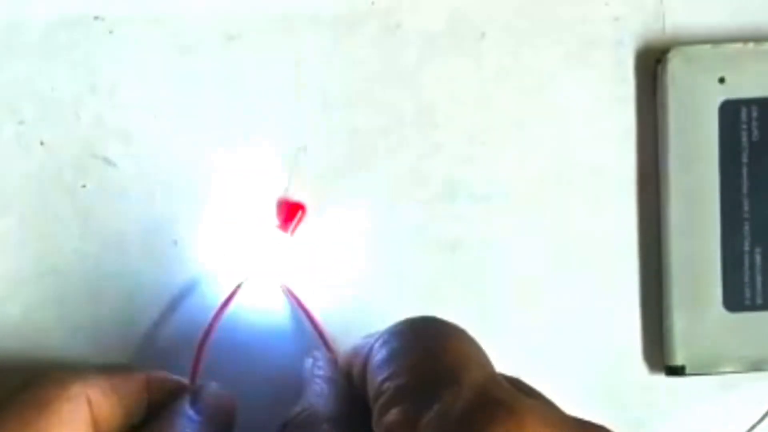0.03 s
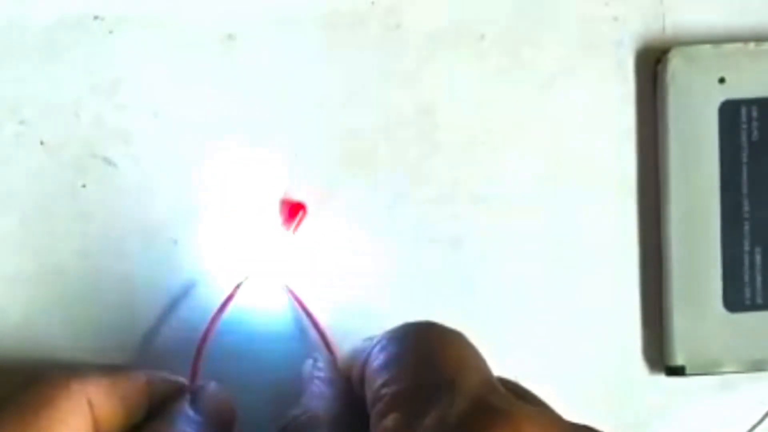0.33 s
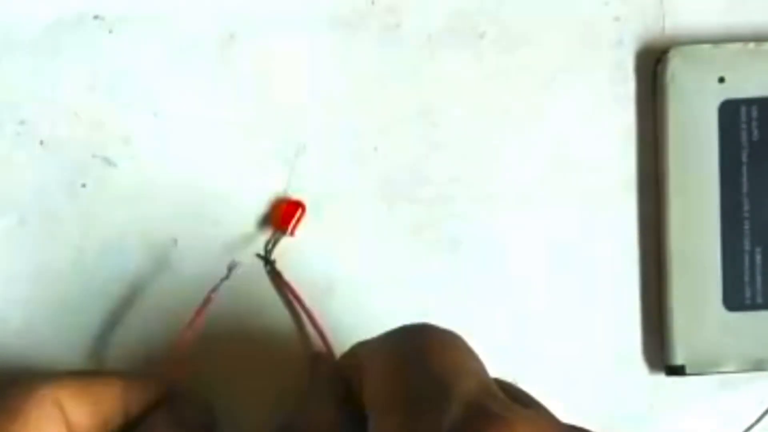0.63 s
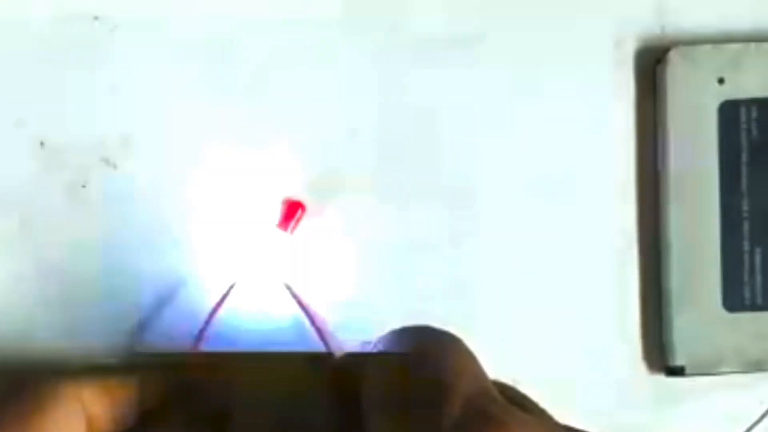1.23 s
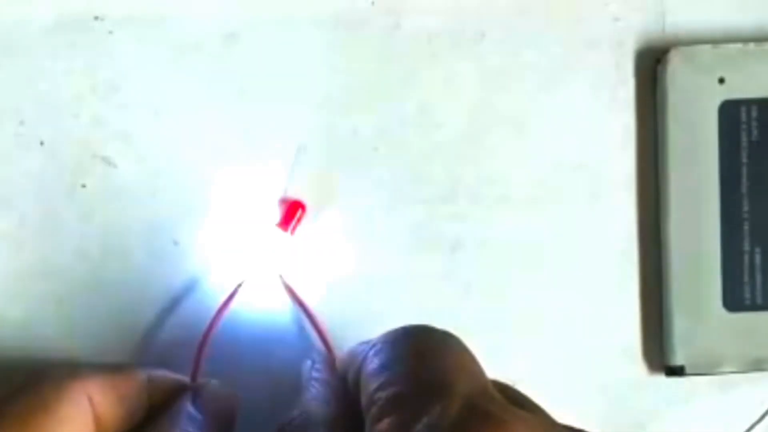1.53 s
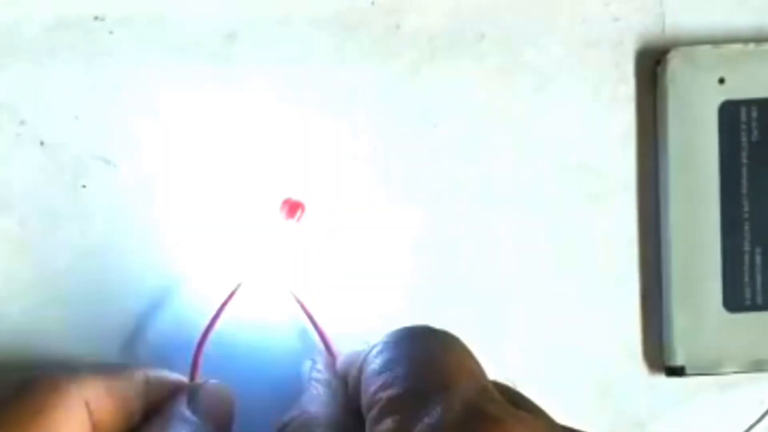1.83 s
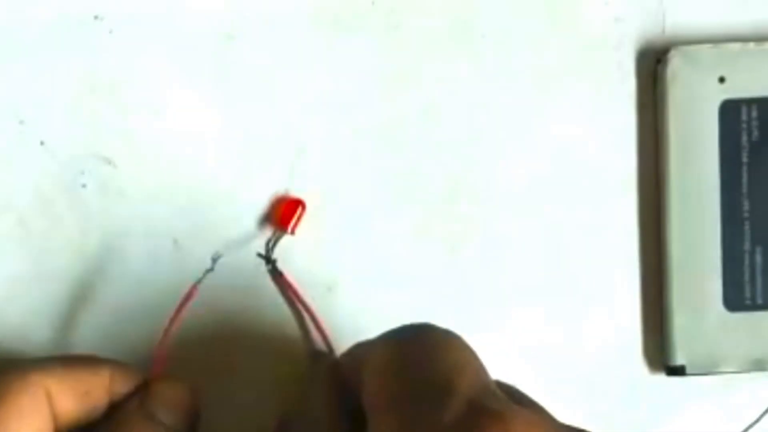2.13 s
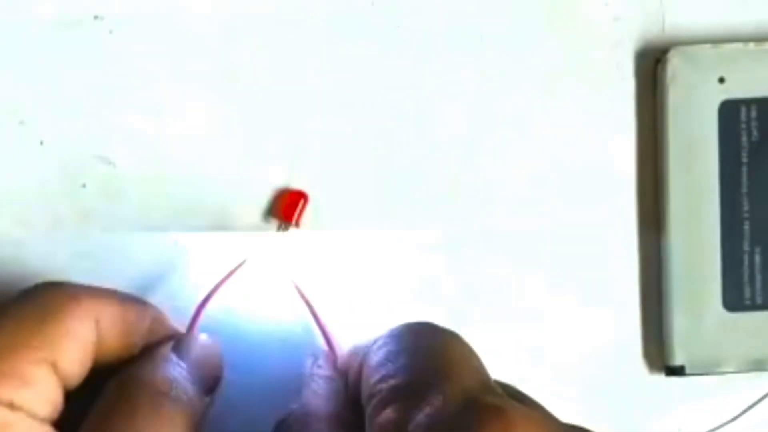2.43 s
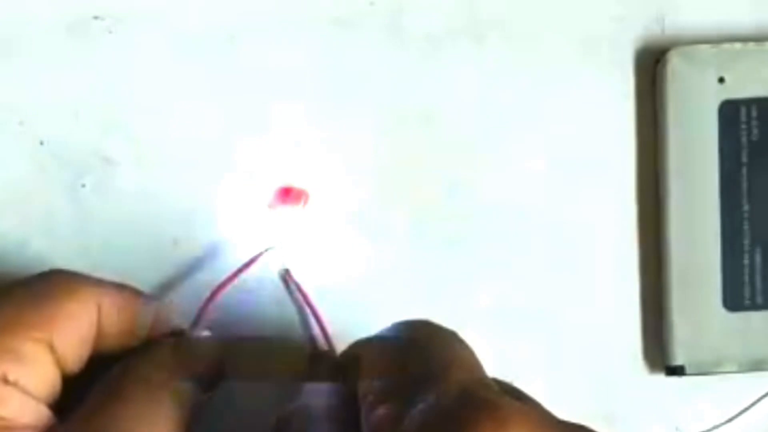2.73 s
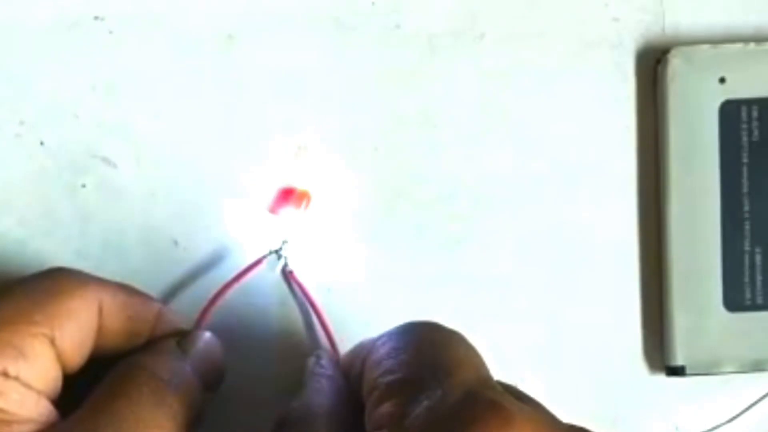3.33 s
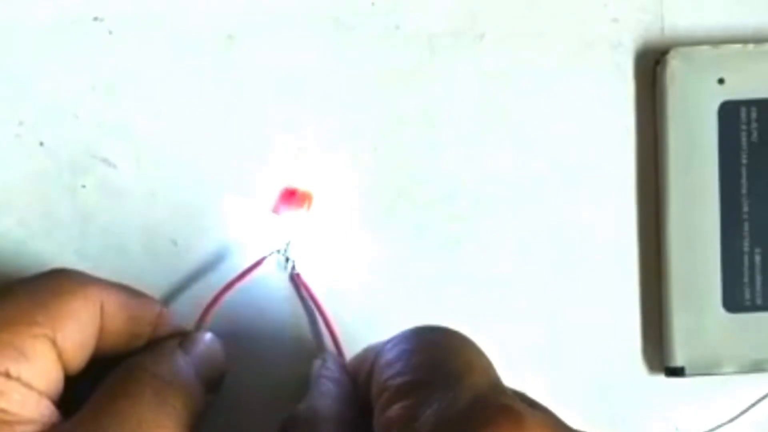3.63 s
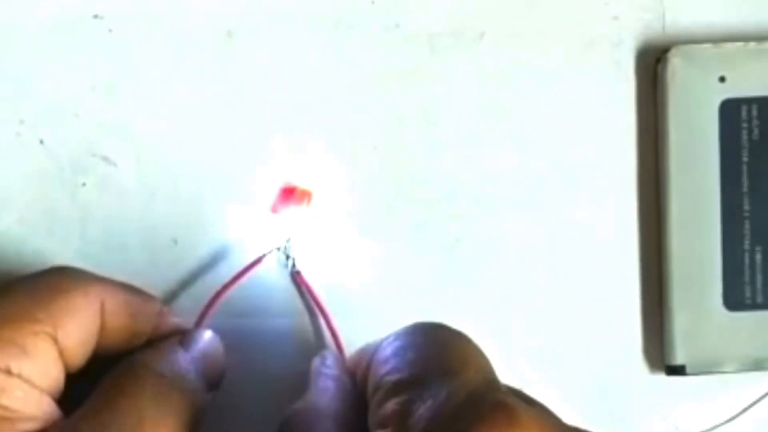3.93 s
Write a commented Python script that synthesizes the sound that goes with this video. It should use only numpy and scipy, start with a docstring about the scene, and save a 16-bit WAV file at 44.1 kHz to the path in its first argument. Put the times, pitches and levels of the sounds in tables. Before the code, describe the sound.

Harsh electric arcing builds from faint hiss into a close, overloaded buzz as two wires spark. It stops for a moment, comes back louder with irregular cracks and sizzle, and keeps sputtering with hardly any room sound.

```python
"""Out of faint hiss, a mains-fed spark strikes between two wire tips and its interference enters a recorder.
The arc restrikes every half cycle with a tick, sizzles in between and cracks as it jumps to a new spot.
Soon heavy flares saturate the input, choking the sizzle until the coupling capacitor recovers; some break
up in hard snaps. The harsh buzz swells, stops briefly near 1.5 s, resumes louder, breaks for an instant
near 3.1 s and sputters on to the end."""
import sys
import numpy as np
from scipy import signal
from scipy.fft import rfft, irfft, next_fast_len
from scipy.io import wavfile
from scipy.ndimage import uniform_filter1d

SR = 44100
rng = np.random.default_rng(int(sys.argv[2]) if len(sys.argv) > 2 else 0)


def dump(signal):
    """Clip the signal to [-1, 1] and save it as 16-bit WAV at the path in sys.argv[1]."""
    limited = np.clip(np.atleast_2d(signal).T, -1, 1)
    pcm = np.round(limited * 32767).astype(np.int16)
    wavfile.write(sys.argv[1], SR, pcm)


N = 176400
TIME = np.arange(N) / SR
MAINS_HZ = 50.01


def amp(db):
    """Amplitude ratio of a level in decibels."""
    return 10 ** (np.asarray(db) / 20)


def curve(rows):
    """Linear interpolation of (t/s, value) rows at every sample."""
    return np.interp(TIME, *np.transpose(rows))


def wander(rate_hz):
    """Slow noise: linear interpolation between Gaussian values drawn at rate_hz."""
    return np.interp(TIME * rate_hz, np.arange(N), rng.standard_normal(N))


def coloured(x, points):
    """Minimum-phase filter with the (f/Hz, level/dB) response, built by folding the cepstrum."""
    size = 2 * next_fast_len(N // 2 + 8192)
    hz, db = np.transpose(points)
    log_hz = np.log(np.fft.rfftfreq(size, 1 / SR) + 1)
    cepstrum = irfft(np.log(amp(np.interp(log_hz, np.log(hz), db))))
    cepstrum[1:size // 2] *= 2
    cepstrum[size // 2 + 1:] = 0
    return irfft(rfft(x, size) * np.exp(rfft(cepstrum)))[:N]


def noise(points):
    """Spectrally shaped Gaussian noise of unit rms."""
    x = coloured(rng.standard_normal(N), points)
    return x / x.std()


def burst(start, db, ms):
    """Envelope with an instant onset and a Gaussian decay."""
    age_ms = (TIME - start) * 1000
    return amp(db) * (TIME >= start) * np.exp(-np.minimum((age_ms / ms) ** 2, 20))


# Spectrum of the input's own noise: f/Hz, relative level/dB
FLOOR_SPECTRUM = [(30, 13), (300, -2), (2000, -16), (11000, -15), (16000, -20)]
def input_hiss():
    """Noise floor: a faint, stationary hiss."""
    return amp(-82) * noise(FLOOR_SPECTRUM)


# Stretches of arcing: first strike t/s, end t/s
ARCS = [(.0843, 1.466), (1.6323, 3.09), (3.1161, 4.0)]
def arc():
    """Reignition every half cycle: returns the strike times and a gate that is 1 while the arc burns."""
    jitter_s = .00012
    grid = np.concatenate([np.arange(start, end, .5 / MAINS_HZ) for start, end in ARCS])
    strikes = grid + jitter_s * rng.standard_normal(len(grid))
    gate = sum(1. * ((TIME > start) & (TIME < end)) for start, end in ARCS)
    return strikes, uniform_filter1d(gate, size=60)


# Runs of heavy flares, one flare per mains cycle: start t/s, count, duration/ms
FLARES = [(.185, 1, 10.7), (.244, 1, 3.4), (.275, 3, 7.45), (.395, 1, 6.8), (.475, 3, 6.1), (.535, 1, 9.4),
          (.554, 2, 5.5), (.595, 3, 7.4), (.664, 1, 8.5), (.674, 1, 7.8), (.744, 1, 2.5), (.754, 2, 4.36),
          (.794, 1, 8.5), (.834, 1, 8.3), (.954, 1, 4.2), (.974, 1, 11.8), (1.004, 1, 3.3), (1.024, 1, 9.3),
          (1.044, 2, 4), (1.124, 1, 4.3), (1.254, 2, 8.2), (1.294, 1, 4.8), (1.384, 1, 8.3), (1.454, 1, 3),
          (1.633, 1, 9.1), (1.732, 1, 2.8), (1.782, 1, 13), (1.802, 1, 6.2), (1.832, 1, 1.1),
          (1.882, 1, 11.9), (1.902, 1, 5.4), (1.932, 1, 1.5), (1.952, 1, 4.3), (1.962, 1, 2.95),
          (2.002, 1, 10.7), (2.022, 1, 8), (2.072, 1, 1.8), (2.112, 1, 6.5), (2.152, 1, 4.06),
          (2.183, 1, 3.3), (2.192, 1, 1.8), (2.242, 1, 8.9), (2.283, 1, 6.4), (2.312, 1, 8.9),
          (2.372, 1, 3.7), (2.412, 2, 7.7), (2.463, 1, 3.24), (2.492, 1, 4.1), (2.533, 1, 3.3),
          (2.632, 1, 4), (2.642, 1, 2.7), (2.682, 3, 6.6), (2.742, 1, 9.8), (2.762, 1, 4.5),
          (2.782, 1, 8.8), (2.802, 1, 5.3), (2.852, 1, 4.2), (2.882, 1, 6.2), (2.922, 1, 6.3),
          (2.942, 1, 9.3), (2.962, 1, 11), (2.982, 1, 8), (3.003, 1, 5.4), (3.116, 1, 7.2),
          (3.126, 2, 4.24), (3.166, 2, 6.84), (3.206, 1, 8.3), (3.226, 1, 4.1), (3.256, 1, 3.7),
          (3.266, 1, 4.1), (3.296, 2, 4.4), (3.416, 1, 9.7), (3.486, 1, 1.9), (3.506, 1, 8.7),
          (3.606, 3, 6.4), (3.726, 2, 6.27), (3.766, 4, 7.7), (3.846, 2, 4.03), (3.916, 1, 5.4),
          (3.946, 2, 6.7)]
# Hard strikes that pop out of the buzz: t/s, duration/ms
POPS = [(.214, 0.82), (.354, 0.44), (.424, 0.41), (.444, 0.48), (.464, 0.25), (.704, 0.45), (.764, 0.52),
        (.854, 0.44), (.894, 0.37), (.934, 0.76), (.994, 0.4), (1.144, 0.29), (1.234, .5), (1.652, 0.39),
        (1.752, 0.57), (1.772, 0.34), (2.132, 0.54), (2.562, 0.64), (2.672, 0.27), (2.902, 0.95),
        (2.912, 1.9), (3.346, 0.35), (3.356, 0.37), (3.376, 0.38), (3.396, 0.22), (3.436, 0.54),
        (3.446, 0.38), (3.596, 0.43), (3.716, 0.51)]
def surges(strikes):
    """RC coupling: each strike pulls the input down (limit = 1); the capacitor swings it back past zero."""
    tick_ms, hot_ms, typical_flare_ms, recovery_s = 0.15, 0.21, 7.2, 0.0093
    tick_push, hot_push, flare_push, pop_push = 0.49, 3.2, 3.39, 2.36
    tick_spread, flare_spread = 0.53, 0.044  # log-normal scatter
    tick_draw, step_draw, flare_draw, push_draw = rng.standard_normal((len(strikes), 4)).T
    length_ms = tick_ms * np.exp(tick_spread * np.clip(tick_draw, -2, 2))
    push = tick_push * np.exp(tick_spread * push_draw)
    voltage_step = 0.72 * step_draw  # the arc voltage jumps at each strike
    for start, count, ms in FLARES:
        for cycle in range(round(count)):
            i = np.argmin(abs(strikes - start - cycle / MAINS_HZ))
            length_ms[i] = ms * np.exp(flare_spread * flare_draw[i])
            push[i] = flare_push * (ms / typical_flare_ms) ** 0.84  # longer flares push harder
            # a short, hot strike follows each flare
            length_ms[i + 1] = hot_ms * np.exp(tick_spread * tick_draw[i + 1])
            push[i + 1] = hot_push
    for start, ms in POPS:
        i = np.argmin(abs(strikes - start))
        length_ms[i], push[i] = ms, max(push[i], pop_push)
    ends = strikes + length_ms / 1000
    edge_samples = (np.r_[strikes, ends] * SR).astype(int)
    edges = np.bincount(edge_samples, np.r_[voltage_step - push, push], N)[:N]
    return signal.lfilter([1], [1, -np.exp(-1 / (recovery_s * SR))], edges)


# Envelope of the arc noise: t/s, level/dB before trim and modulation
SIZZLE_LEVEL = [(.085, -69), (.1, -65), (.18, -59), (.21, -49.5), (.37, -54.5), (.39, -43.5), (.59, -39),
                (.67, -37.5), (.7, -33), (.73, -45), (.79, -33.5), (.87, -45.5), (.895, -36.5), (.94, -39),
                (1.0, -37), (1.09, -40), (1.15, -39), (1.17, -38), (1.21, -33), (1.24, -32.5), (1.29, -34),
                (1.33, -41), (1.37, -32), (1.66, -33), (1.71, -33), (1.78, -25.5), (1.86, -35), (1.92, -29),
                (2.1, -34), (2.14, -26), (2.24, -34.5), (2.33, -26.5), (2.43, -32.5), (2.56, -27.5),
                (2.6, -33.5), (2.65, -28.5), (2.78, -30.5), (2.83, -27), (2.87, -28.5), (2.92, -30),
                (3.07, -31), (3.14, -27.5), (3.19, -30), (3.35, -27), (3.41, -32.5), (3.43, -23.5),
                (3.46, -31), (3.74, -26.5), (3.96, -31.5), (3.99, -29)]
# Spectrum of the arc noise: f/Hz, relative level/dB
SIZZLE_SPECTRUM = [(100, 3), (1000, -11), (2600, -9.5), (5000, -6), (8500, -6), (11100, 1.5), (12500, 1),
                   (15500, -10)]
def sizzle(strikes):
    """Amplitude-modulated arc noise: a spit at each strike, then hiss growing through the half cycle."""
    trim_db, scatter_db, growth_db = -2.5, 2.5, 7.5
    spit_db, spit_decay_s, flicker_db = 11.5, 0.0013, 2
    latest = np.maximum(np.searchsorted(strikes, TIME, side="right") - 1, 0)
    age = np.clip(TIME - strikes[latest], 0, .5 / MAINS_HZ)
    hiss_draw, spit_draw = rng.standard_normal((len(strikes), 2))[latest].T
    hiss = amp(scatter_db * hiss_draw + growth_db * (2 * MAINS_HZ * age - .5))
    spit = amp(spit_db + scatter_db * spit_draw) * np.exp(-age / spit_decay_s)
    envelope = amp(curve(SIZZLE_LEVEL) + trim_db) * np.hypot(hiss, spit)
    return envelope * noise(SIZZLE_SPECTRUM) * amp(flicker_db * wander(rate_hz=1454))


def room(x, level_db=-26, t60_s=0.38):
    """Reverberation of a small room: convolution with exponentially decaying noise."""
    t = TIME[:SR // 2]
    tail = rng.standard_normal(len(t)) * np.exp(-np.log(1000) * t / t60_s)
    return amp(level_db) * signal.fftconvolve(x, tail / np.linalg.norm(tail))[:N]


# Spectrum of the ripple: f/Hz, relative level/dB
RIPPLE_SPECTRUM = [(30, 3), (300, -8.5), (900, -13), (2200, -17.5), (4000, -27.5), (12000, -43)]
def ripple():
    """Additive noise, mostly low in frequency, keeps the clipped wave unsteady."""
    return amp(-27) * noise(RIPPLE_SPECTRUM)


# Jumps of the arc: t/s, level/dB re the input's limit, duration/ms
CRACKS = [(.094, 3, 4), (.153, -6, 4.5), (.214, 2, 4.3), (.253, -10, 4), (.354, -2, 3.8), (.384, -1.5, 11),
          (.682, 5, 3.1), (.696, -10, 22), (.893, 3, 2.2), (.994, -3, 0.84), (1.034, 2, 0.92),
          (1.131, 0, 7.8), (1.166, 3.5, 13), (1.232, -7, 7.3), (1.362, -3, 14), (1.423, -12, 7.1),
          (1.631, 9, 2.4), (1.672, -9, 6.8), (1.703, -6, 23), (1.792, 13, .7), (1.832, -5, 1.7),
          (1.921, -3, 7), (2.076, -3.5, 11), (2.211, -7, 7.3), (2.239, -2, 5.1), (2.2522, 13, 0.99),
          (2.402, -4, 15), (2.818, -8, 14), (2.932, 0, 0.69), (2.9522, 3, 0.68), (2.962, 14, .6),
          (2.972, 6, .8), (2.982, 6, .6), (2.992, 17, 1.1), (3.112, -6, 4.7), (3.24, -6, 41),
          (3.352, -7, 15), (3.654, -12, 2.5)]
# Spectrum of a crack: f/Hz, relative level/dB
CRACK_SPECTRUM = [(300, -11), (2000, -12.5), (3500, -4.5), (6000, -5), (9000, -2.5), (11200, 7.5),
                  (13000, 1.5), (16000, -8.5)]
def cracks():
    """Broadband transients: a bright burst of noise as the arc jumps to a new spot."""
    return sum(burst(*row) for row in CRACKS) * noise(CRACK_SPECTRUM)


# Long flares breaking up: t/s, level/dB re the input's limit, duration/ms, nominal chatter f/Hz
SNAPS = [(0.5445, 10, 1.6, 1300), (1.393, 15, 1.7, 1250), (1.6419, 16, 2.5, 850), (1.8935, 7, 1.4, 1100),
         (1.9116, 5.5, 1.4, 1100), (2.013, 11.5, 1.6, 1200), (2.2518, 17, 1.45, 800), (2.321, 13, 1.4, 900),
         (2.952, 12.5, 1.8, 1210), (2.9916, 14.5, 1.6, 1870), (3.237, 5, 1, 1100), (3.516, 13, 1.7, 1100)]
def snaps(rate_spread=0.56):
    """Damped oscillation: the arc chatters on and off at a wavering rate, pulling the input down first."""
    clock = np.cumsum(np.exp(rate_spread * wander(rate_hz=1300))) / SR
    chatter = np.zeros(N)
    for start, db, ms, hz in SNAPS:
        phase = 2 * np.pi * hz * (clock - clock[int(start * SR)])
        chatter -= burst(start, db, ms) * np.sin(phase)
    return chatter


def drain(burning, limit, decay_s=.11):
    """Exponential discharge: in each break a faint, inaudible DC offset creeps back to zero."""
    retained = np.exp(-1 / (decay_s * SR))
    charge = signal.lfilter([1 - retained], [1, -retained], burning * limit)
    return -amp(-17) * (1 - burning) * charge


# Clipping limit of the input, which sets the swell: t/s, level/dB
LIMIT_LEVEL = [(.085, -57), (.1, -43), (.2, -43.5), (.3, -37.5), (.5, -33.5), (.8, -28.5), (1.0, -26.5),
               (1.4, -24.5), (1.65, -22.5), (1.9, -19.5), (2.3, -22), (2.7, -20), (3.2, -20), (4.0, -20)]
def scene():
    """Saturation of one mono input: the deeper the overload, the less sizzle gets through."""
    knee, leak_db = 19, -15.5  # hardness of the limit; sizzle that gets past it
    choke_depth, choke_power = 2.08, 4.2  # surge that halves the leak (limit = 1); steepness
    strikes, burning = arc()
    limit = amp(curve(LIMIT_LEVEL))
    arc_noise = burning * sizzle(strikes)
    surge = surges(strikes)
    arc_noise += room(arc_noise)
    drive = surge + snaps() + cracks() + arc_noise / limit
    clipped = drive / (1 + abs(drive) ** knee) ** (1 / knee)
    buzz = limit * (clipped + burning * ripple())
    leak = amp(leak_db) * arc_noise / (1 + (abs(surge) / choke_depth) ** choke_power)
    mono = buzz + leak + drain(burning, limit) + input_hiss()
    return np.array([mono, mono])


# Frequency response of the recorder: f/Hz, gain/dB
INPUT_RESPONSE = [(20, 1.5), (100, 2.54), (500, 2), (1500, -0.6), (2600, -1.7), (4000, -1), (7000, 2),
                  (11000, 1), (13500, -9), (16000, -17)]
def record(dry):
    """Linear filtering: the recorder's response, then a steep low-pass band limit."""
    tinted = np.array([coloured(channel, INPUT_RESPONSE) for channel in dry])
    band_limit = signal.ellip(10, .1, 90, 16000, fs=SR, output="sos")
    return signal.sosfilt(band_limit, tinted)


dry = scene()
out = record(dry)
dump(out)
```